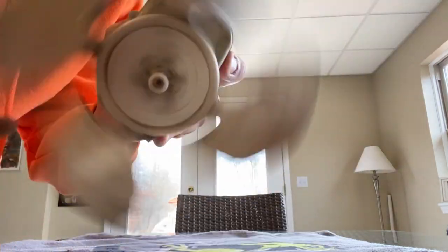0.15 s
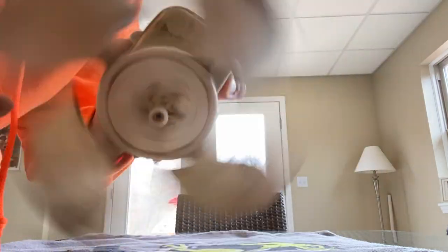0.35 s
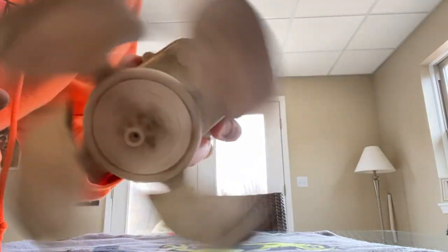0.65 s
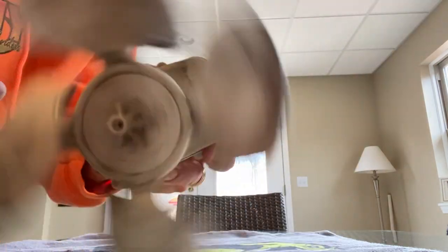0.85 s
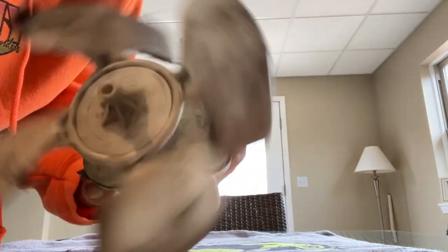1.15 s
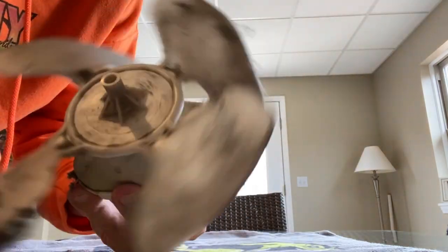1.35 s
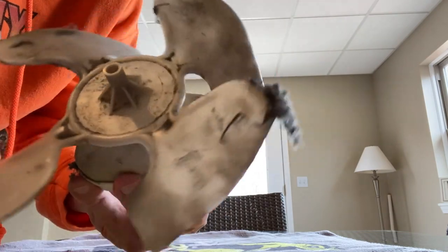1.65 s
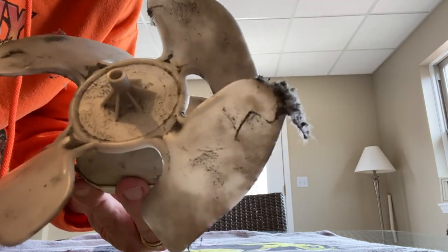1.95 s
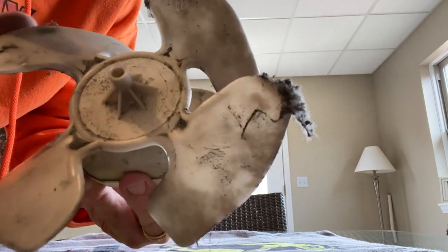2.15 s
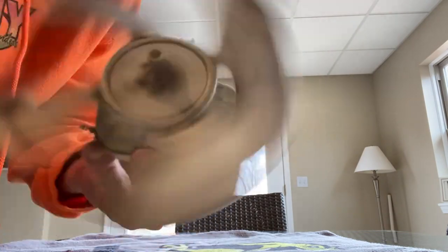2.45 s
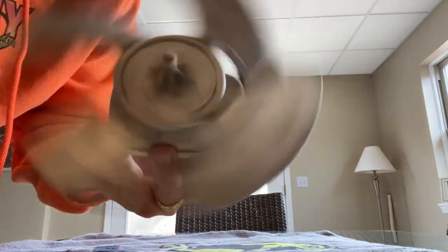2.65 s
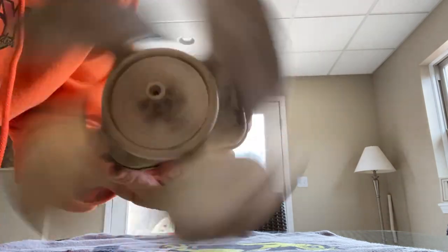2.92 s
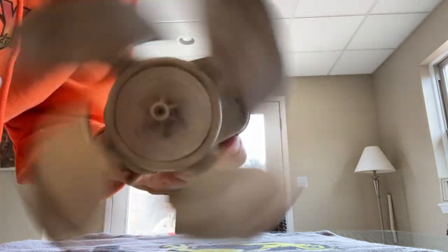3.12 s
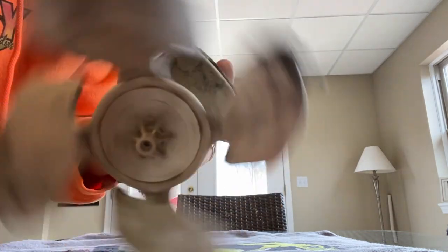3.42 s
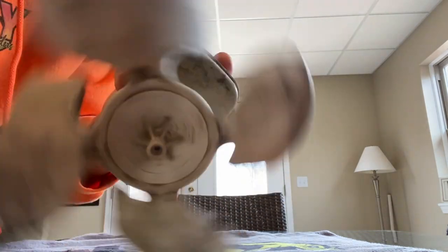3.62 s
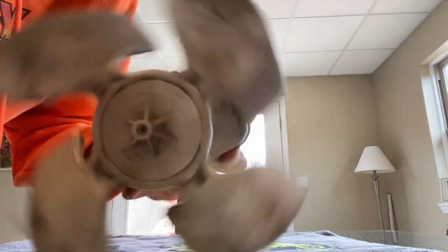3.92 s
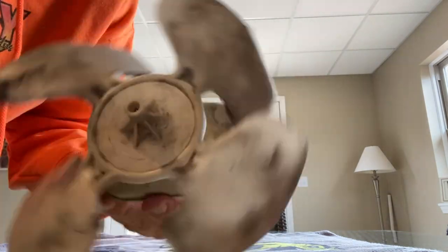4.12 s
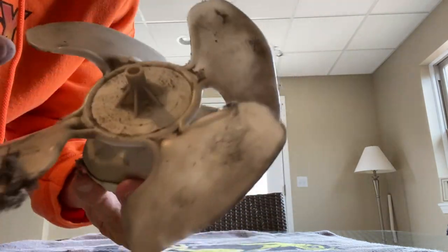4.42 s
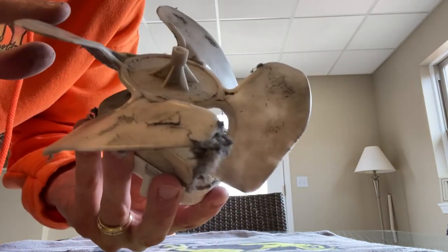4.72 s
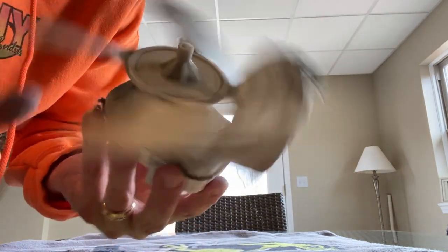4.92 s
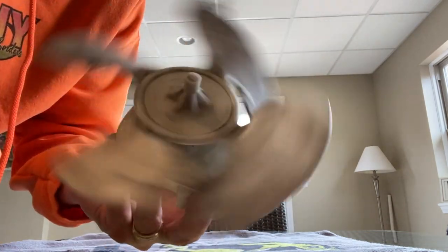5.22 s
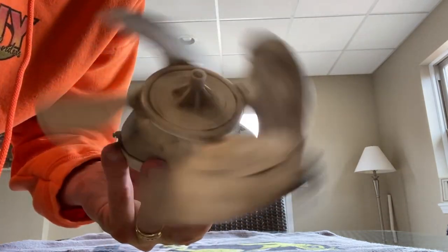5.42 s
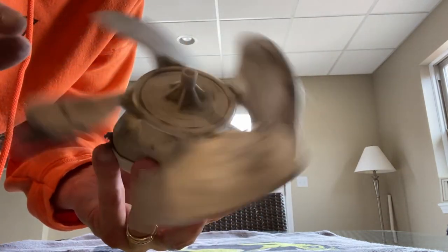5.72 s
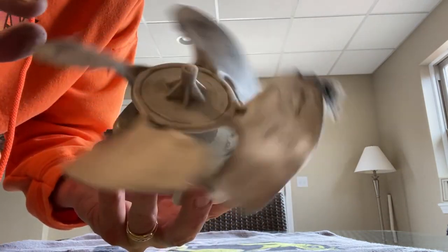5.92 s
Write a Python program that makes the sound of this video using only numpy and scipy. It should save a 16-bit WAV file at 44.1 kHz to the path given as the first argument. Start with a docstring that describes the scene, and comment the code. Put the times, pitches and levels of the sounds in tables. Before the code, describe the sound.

A small worn fan motor coasts with a faint dry hiss and squeaks twice. Fingers flick the blades with a soft knock and a puff of air, bringing short chirps, very high whistles and two more squeaks. After a second flick, the squeaks run together into a rough, steady, rattling squeal. The fan is close to a stereo microphone in a quiet room.

```python
"""The dry shaft of a worn fan motor, close to a stereo microphone in a quiet room, flicked round by hand.
It hisses as it coasts, whistles very high, and sticks and slips in short squeaks that drop in pitch as
it grips. The blades are already turning at the start; twice the fingers rub, snap off an edge and knock
the fan, and the spinning blades waft air over the microphone. After the second flick the squeak breaks
into a rough, steady squeal that makes the blades judder."""
import sys
import numpy as np
from scipy import signal
from scipy.fft import rfft, irfft, next_fast_len
from scipy.io import wavfile

SR = 44100
rng = np.random.default_rng(int(sys.argv[2]) if len(sys.argv) > 2 else 0)


def waveform_to_disk(signal):
    """Save audio, clipped to [-1, 1], as 16-bit WAV at the path in sys.argv[1]."""
    frames = np.transpose(np.atleast_2d(signal))
    scaled = np.clip(frames, -1, 1) * 32767
    samples = np.round(scaled).astype(np.int16)
    wavfile.write(sys.argv[1], SR, samples)


N = 267775
T = np.arange(N) / SR
SIZE = next_fast_len(N + SR // 4)
HZ = np.fft.rfftfreq(SIZE, 1 / SR)

# each spin of the blades: start_s, length_s, hiss_db, hiss_trend_db_per_s, tight_spot_s, draught_db
SPINS = [(-.42, 2.05, -76.5, 7.5, 0.15, -31.5), (2.431, 1.98, -69.5, -2.5, 2.48, -29),
         (4.825, 1.3, -68.5, 1.5, 4.903, -77)]


def amp(db):
    """Decibels to gain."""
    return 10 ** (np.asarray(db) / 20)


def unit(x):
    """Scales to rms 1."""
    return x / np.sqrt(np.mean(x ** 2) + 1e-20)


def read(points, hz):
    """Reads a table on a log-frequency axis."""
    f, value = np.transpose(points)
    return np.interp(np.log(hz + 1), np.log(f + 1), value)


def colour(x, points):
    """Filters by a spectrum table."""
    return irfft(rfft(x, SIZE) * amp(read(points, HZ)), SIZE)[:N]


def noise(points):
    """Noise of rms 1 with the given spectrum."""
    return unit(colour(rng.standard_normal(N), points))


def wander(rate_hz):
    """Smooth random drift of rms 1, rolled off above the rate."""
    return unit(irfft(rfft(rng.standard_normal(SIZE)) / (1 + (HZ / rate_hz) ** 4), SIZE)[:N])


def phase_of(hz):
    """Running phase of a pitch curve."""
    return 2 * np.pi * np.cumsum(hz) / SR


def ring(x, hz, width):
    """One damped mode, of equal energy at any width."""
    pole = np.exp((2j * np.pi * hz - np.pi * width) / SR)
    return np.sqrt(width) * signal.lfilter([1], [1, -pole], x).imag


def gate(t, length, rise_s, fall_s):
    """Smooth attack at t = 0, hold and release."""
    return (1 + np.tanh(t / rise_s / 2)) * (1 + np.tanh((length - t) / fall_s / 2)) / 4


def catch(t, length, rise_s, fall_s):
    """Sudden attack at t = 0, hold and smooth release."""
    return (1 - np.exp(-np.maximum(t, 0) / rise_s)) ** 1.2 * (1 + np.tanh((length - t) / fall_s / 2)) / 2


def around(start, length):
    """The samples near an event, their time since its start and their progress 0-1 through it."""
    near = slice(*np.searchsorted(T, [start - .15, start + length + .2]))
    t = T[near] - start
    return near, t, np.clip(t / length, 0, 1)


def room_tone():
    """Low, steady background of the house, partly common to both channels."""
    # background spectrum: frequency_hz, level_db
    spectrum = [(15, -32.5), (25, -11), (59, -1), (144, -9), (183, -9), (215, -11.5), (368, -15),
                (469, -18.5), (567, -17.5), (871, -17), (1270, -27), (1800, -30.5), (4500, -40.5),
                (9810, -37), (15500, -66.5)]
    shared = noise(spectrum)
    return amp(-57.5) * np.array([0.54 * shared + 0.79 * noise(spectrum) for _ in range(2)])


def room_reflections(fan, first_s=.004):
    """Sparse reflections from table, walls and ceiling, each band dying at its own speed."""
    # decay of the room: frequency_hz, t60_s
    decay = [(200, 0.4), (1600, 0.2), (3500, 0.19), (6000, 0.26), (13000, 0.19)]
    # what the fan sends into the room: frequency_hz, gain_db
    send = [(300, -8), (1700, -15.5), (3500, -8), (5100, -12), (6500, -23), (8000, -21), (13000, -22)]
    size = SR // 2
    taps = rng.choice([-1., 1.], (2, size)) * (rng.random((2, size)) < .06) * (T[:size] > first_s)
    hz, t, bands = signal.stft(taps, SR, nperseg=256)
    tail = signal.istft(bands * amp(-60 * t / read(decay, hz)[:, None]), SR, nperseg=256)[1]
    return signal.fftconvolve(colour(fan, send)[None], tail / np.linalg.norm(tail[0]), axes=1)[:, :N]


def blade_echo(fan, delay_s=0.000953, sway_s=.00008):
    """The turning blades throw back a short echo whose path keeps changing, differently for each port."""
    echo = colour(fan, [(200, -19.5), (1600, 1.5), (3300, 5), (6000, 22), (9000, -13.5), (13000, -26.5)])
    return amp(-13) * np.array([np.interp(T - delay_s - sway_s * wander(21), T, echo) for _ in range(2)])


def microphone_ports(fan):
    """At close range the fan reaches the two ports with different phase and strength."""
    # phase between the ports: frequency_hz, left_lead_rad
    lead = [(100, 0), (700, -.6), (1200, -.8), (1600, -2.1), (2200, -.9), (3300, -1.5), (5000, -1.1),
            (6700, -.5), (8300, .05), (10100, .6), (13200, 2.1)]
    # where the fan is held: time_s, left_minus_right_db
    balance = [(1.1, 0.5), (1.37, -3), (1.55, -0.5), (2.6, 0), (3.1, 2), (3.8, 0.5), (4.3, -0.5),
               (4.85, -0.5), (5.2, 0), (6.07, 0)]
    turn, spectrum = np.exp(.5j * read(lead, HZ)), rfft(fan, SIZE)
    side = amp(np.interp(T, *np.transpose(balance)) / 2)
    return np.array([irfft(spectrum * turn, SIZE)[:N] * side, irfft(spectrum / turn, SIZE)[:N] / side])


def draught(length_s=.55, lag_s=0.047, fade_db_per_s=-37, first_hz=183.8, last_hz=58, sink_s=0.035):
    """The freshly spun blades waft air over the microphone: one sinking puff, then a dying flutter."""
    # wind on the microphone: frequency_hz, level_db
    air = [(10, -47), (24, -39), (37, 7.5), (60, -6), (90, -10.5), (130, -20.5), (300, -48), (1000, -71.5)]
    flow, puffs = np.zeros((2, N))
    unsteady = 1 + 0.22 * wander(40)
    for start, *_, db in SPINS:
        near, t, _ = around(start, length_s)
        age = np.maximum(t, 0)
        flow[near] += amp(db + fade_db_per_s * age) * gate(t - lag_s, length_s, 0.0047, .025)
        hz = (last_hz + (first_hz - last_hz) * np.exp(-age / sink_s)) * (t > 0)
        push = amp(db + 4.5) * gate(t - lag_s, length=0.094, rise_s=0.018, fall_s=0.018)
        puffs[near] += push * np.sqrt(2) * np.sin(phase_of(hz * unsteady[near]))
    shared = noise(air)
    return puffs + flow * np.array([shared + .6 * noise(air) for _ in range(2)])


def hand():
    """Fingers rub along a blade, snap off its edge and knock the fan."""
    # fingers along a blade: start_s, length_s, first_db, last_db
    rubs = [(2.352, 0.061, -67, -40.5), (4.599, 0.057, -60, -55.5), (4.739, 0.022, -70, -61),
            (4.798, .052, -65.5, -42.5)]
    # a fingertip leaves the edge: time_s, level_db, half_length_s
    snaps = [(2.3828, -37, .0008), (2.4075, -31, .0026), (4.850, -32, .003)]
    # knocks and brushes on blades and housing: start_s, relative_db, rise_s, decay_s
    knocks = [(.705, -57.5, 0.0047, 0.013), (1.58, -50.5, 0.04, 0.1), (2.358, -51, .01, 0.16),
              (2.399, -31.5, 0.018, 0.021), (2.427, -30.5, 0.016, 0.015), (2.629, -55, 0.0078, 0.014),
              (2.729, -56, 0.012, 0.042), (4.07, -48, 0.046, 0.036), (4.824, -47.5, 0.0064, 0.039),
              (4.859, -28, 0.0044, 0.0071), (4.885, -59, 0.0047, 0.042)]
    # modes that a knock rings: frequency_hz, width_hz, level_db
    modes = [(152.8, 30, -5), (250, 130, -9), (350, 30, 1.5), (437.6, 340, 6), (631, 87, -10.5),
             (867, 78, 1.5), (1150, 140, -13.5), (1630, 600, -10.5)]
    # skin friction: frequency_hz, level_db
    skin = [(300, -15), (1500, -19.5), (3500, -3), (5000, -9), (7500, 1), (10500, 0), (13000, -5.5),
            (15500, -6.5)]
    friction, blows = np.zeros((2, N))
    for start, length, first_db, last_db in rubs:
        end = start + length
        friction += amp(np.interp(T, [start, end], [first_db, last_db])) * (T > start) * (T < end)
    for time, db, half_length in snaps:
        friction += amp(db) * np.exp(-((T - time) / half_length) ** 2)
    for start, db, rise, decay in knocks:
        blows += amp(db) * np.clip((T - start) / rise, 0, 1) * np.exp(-abs(T - start) / decay)
    grain = rng.standard_normal(N)
    body = lambda x: sum(amp(db) * ring(x, hz, width) for hz, width, db in modes)
    ringing = body(blows * grain) / np.std(body(grain))
    return friction * noise(skin) * amp(wander(500)) + amp(3) * ringing


def shaft_hiss(flick_db=13, flick_s=0.3, tight_db=3.5, tight_every_s=0.69):
    """Fine, slightly grainy hiss of dry metal on metal, as long as the blades coast."""
    # sliding friction: frequency_hz, level_db
    spectrum = [(500, -36), (3000, -20.5), (4500, -13.5), (6000, -30.5), (8200, -5.5), (10200, -1.5),
                (11500, -4.5), (13000, -4.5), (14200, -20.5), (15000, -48)]
    gain = np.zeros(N)
    for start, length, db, trend_db_per_s, tight_s, _ in SPINS:
        age = np.maximum(T - start, 0)
        press_db = flick_db * np.exp(-age / flick_s)  # the flick presses on the shaft
        swell_db = tight_db * np.cos(2 * np.pi * (T - tight_s) / tight_every_s)  # a tight spot comes round
        coasting = gate(T - start, length, rise_s=.02, fall_s=0.051)
        gain += amp(db + trend_db_per_s * age + press_db + swell_db) * coasting
    return gain * amp(2 * wander(36) + 1.7 * wander(400)) * noise(spectrum)


def shaft_singing(edge_s=0.0044, flutter_db=3):
    """A barely catching shaft gives a thin, wavering tone."""
    # faint tones: start_s, length_s, level_db, pitch_hz
    tones = [(1.223, 0.061, -68, 1900), (2.644, 0.01, -44, 1797), (3.3, 0.069, -58.5, 1805),
             (5.255, 0.033, -37, 1790)]
    tone, unsteady = np.zeros(N), 1 + 0.015 * wander(200)
    for start, length, db, hz in tones:
        near, t, _ = around(start, length)
        tone[near] += amp(db) * gate(t, length, edge_s, edge_s) * np.sin(phase_of(hz * unsteady[near]))
    return tone * amp(flutter_db * wander(80))


def sleeve_whistle(jitter_hz=35, rasp_db=-32, db_per_hz=0.0857):
    """Light contact rings one high mode of the sleeve, with a little rasp around it."""
    # whistles: start_s, length_s, attack_s, relative_db, first_hz, last_hz, arch_hz
    whistles = [ (1.109, .032, .004, -14, 13200, 13230, -70), (2.645, .024, .004, -10.5, 13030, 13170, -90),
                (2.848, .029, .0025, -14.5, 13000, 13090, 60), (3.769, .104, .003, -9, 13030, 13000, 250),
                (3.874, .065, .006, -8.5, 13060, 13260, 220), (4.052, .044, .012, -17, 12970, 12900, 70),
                (4.116, .036, .0025, -21.5, 13090, 13020, 80), ]
    # rasp around the mode: frequency_hz, level_db
    rasp = [(3000, -40), (9000, -51.5), (12000, -9), (13100, 3), (14000, -4), (15500, -37.5)]
    tone, strength = np.zeros((2, N))
    jitter = jitter_hz * wander(240)
    for start, length, attack, db, first_hz, last_hz, arch_hz in whistles:
        near, t, progress = around(start, length)
        lift_hz = arch_hz * np.sin(np.pi * progress)  # pressure lifts pitch and level together
        gain = amp(1.3 + db + db_per_hz * (lift_hz - arch_hz)) * catch(t, length, attack, fall_s=0.0025)
        hz = first_hz + (last_hz - first_hz) * progress + lift_hz + jitter[near]
        tone[near] += gain * np.sqrt(2) * np.sin(phase_of(hz))
        strength[near] += gain
    return tone * amp(.5 * wander(200)) + strength * amp(rasp_db + 3.7 * wander(22)) * noise(rasp)


def shaking(edge_s=.002, lag_s=0.0044, ring_s=0.02):
    """Lumpy strengths of rattle and judder; the blades take up the shaking late and ring on."""
    # the shaft rattles in its worn sleeve: start_s, length_s, rattle_relative_db, judder_relative_db
    bouts = [(1.411, 0.018, -33.5, -36), (5.287, .058, -37, -52), (5.409, 0.13, -35.5, -38.5),
             (5.56, .114, -33, -42), (5.705, .021, -29, -29), (5.766, .068, -35.5, -38),
             (5.831, 0.32, -33, -27.5)]
    rattle, judder = np.zeros((2, N))
    for start, length, rattle_db, judder_db in bouts:
        near, t, _ = around(start, length)
        rattle[near] += amp(rattle_db) * gate(t, length, edge_s, edge_s)
        judder[near] += amp(judder_db) * gate(t - lag_s, length + ring_s, edge_s, ring_s / 2)
    return rattle * amp(1.07 * wander(22)), judder * amp(5.5 * wander(26))


def shaft_chatter(slip_phase, judder_phase, rattle_gain, judder_gain):
    """Uneven slips tap the housing, hardest once in each swing of the blades, which hum with that swing."""
    # the tapped housing: frequency_hz, gain_db
    housing = [(150, -19.5), (300, -5.5), (500, -13), (780, -12.5), (900, 6), (1020, -3), (1150, 0.5),
               (1380, -31), (1880, 3), (2030, -6), (2200, 5), (3000, -9.5), (3700, -9.5), (3930, -17.5),
               (4450, -14.5), (5600, -25), (8000, -19), (13300, -10), (15000, -27)]
    cycles = slip_phase // (2 * np.pi)
    taps = np.diff(cycles, prepend=cycles[0])
    bunching = np.exp(1.1 * np.cos(judder_phase))
    force = bunching / bunching.mean() - 1 + .45 * np.sqrt(bunching) * rng.standard_normal(N)
    rattle = colour(taps * force, housing)
    rattle /= np.sqrt(np.average(rattle ** 2, weights=rattle_gain))
    blades = np.sqrt(2) * (np.sin(judder_phase) + amp(-15.5) * np.sin(2 * judder_phase))
    return amp(-2.5) * rattle_gain * rattle + amp(-10.5) * judder_gain * blades


def shaft_grip(swing, let_go_s=0.0035, sag_hz_per_s=35000, release_hz=60.43, dulling_db=-5.5):
    """Pitch, roughness and levels of the squeaks: each catch lowers the pitch and brings out overtones."""
    # the shaft catches: start_s, length_s, attack_s, level_db, fade_db, gripped_hz, last_hz, drop_hz,
    # octave_db, upper_relative_db, roughness (0-1)
    squeaks = [ (1.312, 0.11, 0.0035, -16.5, -3, 1539, 1520, 330.1, -27, -10, .28),
               (1.508, 0.15, 0.0026, -24, -11.5, 1629, 1740, 110.2, -23, -6.5, .04),
               (2.542, 0.014, 0.00585, -44, 0.5, 1570, 1590, 60.27, -35, -23.5, .3),
               (2.767, 0.018, 0.0071, -32.5, 0.5, 1713, 1751, 110.1, -18.5, -7, .1),
               (2.924, .045, 0.012, -25.5, -0.5, 1604, 1686, 278.7, -8, -5.5, 0),
               (3.088, .061, 0.0016, -24, -2, 1628, 1739, 39.9, -2, -5.5, .08),
               (4.206, 0.046, 0.0051, -20, -4, 1593, 1674, 159.6, -12, -2.5, .06),
               (4.264, .13, 0.0067, -21, -14, 1605, 1703, 109.2, -12, -2, 0),
               (4.974, 0.013, 0.0046, -37.5, -1, 1670, 1660, 60.13, -19, -33, .2),
               (5.099, 0.03, 0.0095, -28, -1, 1590, 1720, 170.3, -20.5, -13, .65),
               (5.175, 0.025, .006, -28.5, 0.5, 1650, 1620, 170.9, -19.5, -5.5, 0.6),
               (5.207, .023, 0.0065, -29.5, 0.5, 1700, 1720, 60.63, -20.5, -17, .45),
               (5.275, 0.067, 0.0042, -25, 0.5, 1488, 1570, 247.4, -20, -13.5, .4),
               (5.386, .145, 0.0048, -22.5, -3, 1523, 1603, 269.8, -29.5, -11.5, .33),
               (5.533, .143, 0.018, -24, -4.5, 1580, 1570, 40.1, -21.5, -9, .4),
               (5.692, 0.029, 0.0034, -25.5, -1, 1467, 1510, 199.7, -26, -6.5, 0.5),
               (5.756, 0.32, 0.0031, -26.5, -3.5, 1587, 1560, 99.36, -28, -14.5, 0.5), ]
    # the shaft bites harder and turns shrill: start_s, length_s, overtone_lift_db
    bites = [(5.44, .06, 3.5), (5.785, .025, 10), (5.905, .08, 10)]
    fundamental, octave, overtones, pitch, roughness, bite_db = np.zeros((6, N))
    for (start, length, attack, db, fade_db, gripped_hz, last_hz, drop_hz,
         octave_db, upper_db, rough) in squeaks:
        near, t, progress = around(start, length)
        grip, held = catch(t, length, attack, let_go_s), np.maximum(t, 0)
        level = amp(db + fade_db * progress ** 2)
        tone = level * (grip + amp(-14) * np.exp(-abs(t) / .007))  # a thin tone leads the catch
        firm = level * grip ** 1.2 * amp(dulling_db * (progress - .5))  # overtones need a firm grip
        sag = drop_hz * np.exp(-held * sag_hz_per_s / drop_hz)
        easing = (last_hz - gripped_hz) * np.sin(np.pi / 2 * progress)
        spring_back = release_hz * (1 + np.tanh((t - length) / let_go_s / 2)) / 2
        fundamental[near] += tone
        octave[near] += firm * amp(octave_db)
        overtones[near] += firm * amp(upper_db)
        pitch[near] += tone * (gripped_hz + sag + easing + spring_back)
        roughness[near] += tone * (rough + .42 * np.exp(-held / 0.011))  # roughest on catching
    for start, length, db in bites:
        near, t, _ = around(start, length)
        bite_db[near] += db * gate(t, length, rise_s=0.0022, fall_s=0.0022)
    weight = fundamental + 1e-15  # overlapping squeaks are averaged by strength
    hz = pitch / weight + 22 * swing * wander(18) + 9 * wander(60)  # a rattling shaft grips unsteadily
    rough = np.clip(roughness / weight + .48 * swing, 0, 1)
    tone_db = 0.15 * bite_db - 0.5 * swing * wander(28)
    flutter = amp(2 * np.sqrt(rough) * wander(64))
    return hz, rough, flutter * np.array([fundamental * amp(tone_db), octave, overtones * amp(bite_db)])


def stick_slip(hz, rough, jitter=0.0024, rough_jitter=0.018):
    """Running phase of the stick-slip cycle; a rough contact keeps worse time."""
    return phase_of(hz * (1 + jitter * wander(500) + rough * rough_jitter * wander(300)))


def shaft_squeak(slip_phase, judder_phase, levels, rough, swing, shrill_hz=4580):
    """The shaft sticks and slips; uneven slips smear the overtones, and the blade swing adds sidebands."""
    # how the housing radiates the upper overtones: frequency_hz, gain_db
    housing = [(4000, -9), (4350, 4), (4650, -3.5), (4900, 4), (5120, -5.5), (5600, -10), (6150, -12),
               (7000, 0), (8300, 6), (9200, 1), (10100, 5.5), (11000, -2.5), (12000, 1), (13300, 0),
               (14500, -16.5), (15500, -37.5)]
    fundamental, octave, overtones = levels
    uneven = slip_phase + 0.11 * rough * wander(1100)  # each slip comes a little early or late
    harmonics = sum(amp(2 * wander(45)) * np.sin(k * uneven + k * k) for k in range(3, 10))
    scrape = 0.83 * rough ** 2 * (1 + np.cos(slip_phase)) * rng.standard_normal(N)
    scrape *= amp(6.6 * wander(300))
    upper = colour((harmonics + scrape) * (overtones > 1e-6), housing)
    upper /= np.sqrt(np.average(upper ** 2, weights=overtones))
    # a rattling shaft also wakes a shrill mode of the housing
    shrill = np.sqrt(2) * np.sin(phase_of(shrill_hz + 110 * wander(250))) * amp(1.5 * wander(100))
    upper = upper * (1 - 0.36 * swing) + amp(-2) * swing * shrill
    low = np.sqrt(2) * (fundamental * np.sin(slip_phase) + octave * np.sin(2 * uneven))
    load = 1 + 0.19 * rough * wander(100) + 0.14 * swing * np.cos(judder_phase)
    return (low + amp(-5) * overtones * upper) * load


def scene(judder_hz=330, full_swing_db=-35):
    """The fan close to the microphone, with its draught and the quiet room behind it."""
    judder_phase = phase_of(judder_hz * (1 + 0.018 * wander(24)))
    rattle_gain, judder_gain = shaking()
    swing = np.clip(rattle_gain / amp(full_swing_db), 0, 1)
    hz, rough, levels = shaft_grip(swing)
    slip_phase = stick_slip(hz, rough)
    fan = shaft_squeak(slip_phase, judder_phase, levels, rough, swing)
    fan += shaft_chatter(slip_phase, judder_phase, rattle_gain, judder_gain)
    fan += shaft_singing() + sleeve_whistle() + shaft_hiss() + hand()
    return microphone_ports(fan) + blade_echo(fan) + room_reflections(fan) + draught() + room_tone()


def record(dry):
    """The recorder cuts off steeply at 15.7 kHz."""
    return signal.oaconvolve(dry, signal.firwin(401, 15700, window=("kaiser", 9), fs=SR)[None], "same")


dry = scene()
out = record(dry)
waveform_to_disk(out)
```